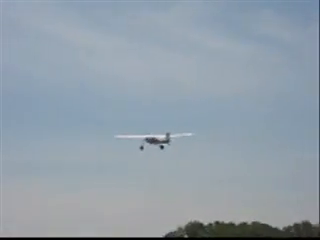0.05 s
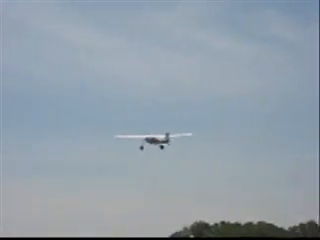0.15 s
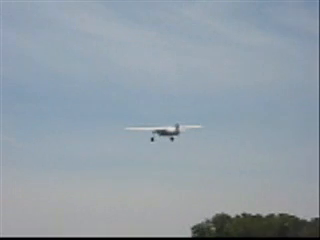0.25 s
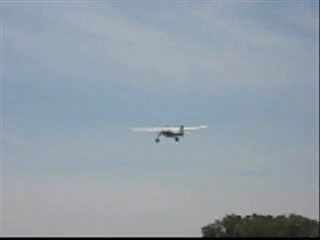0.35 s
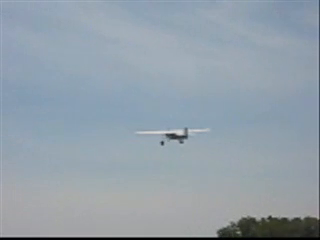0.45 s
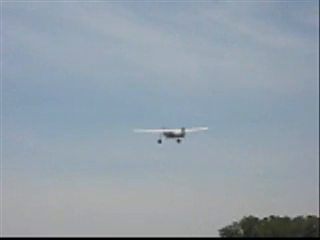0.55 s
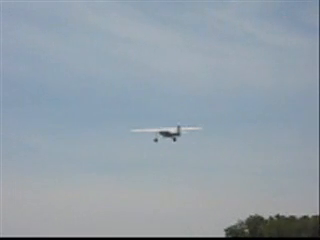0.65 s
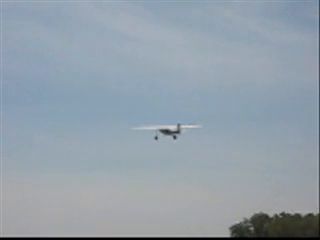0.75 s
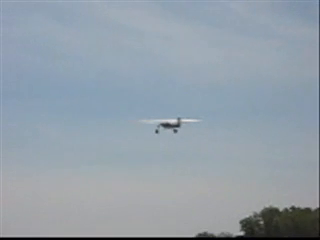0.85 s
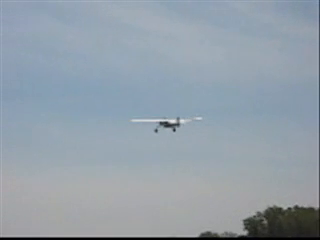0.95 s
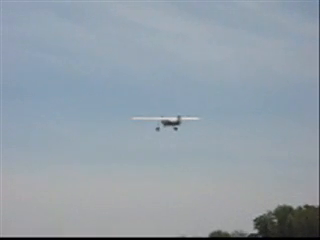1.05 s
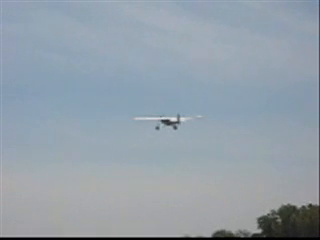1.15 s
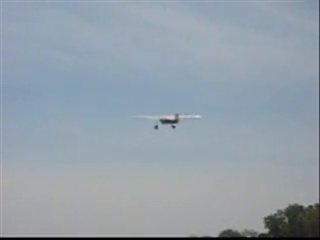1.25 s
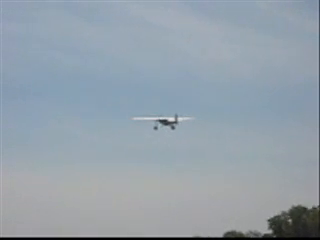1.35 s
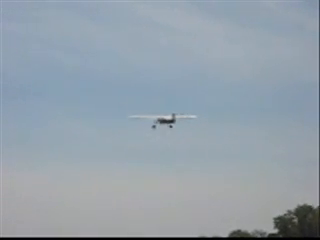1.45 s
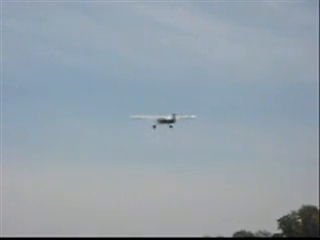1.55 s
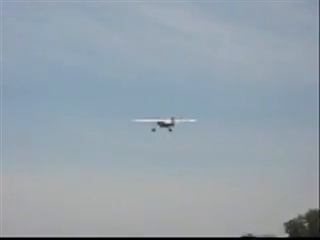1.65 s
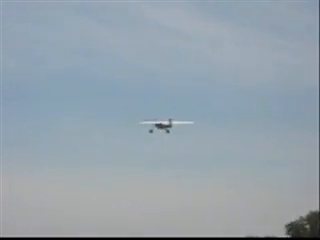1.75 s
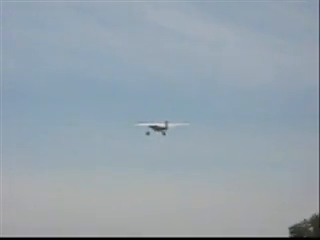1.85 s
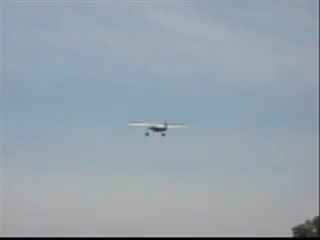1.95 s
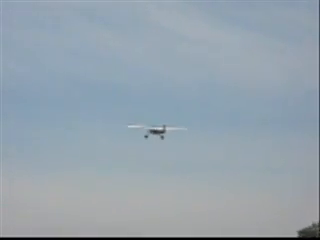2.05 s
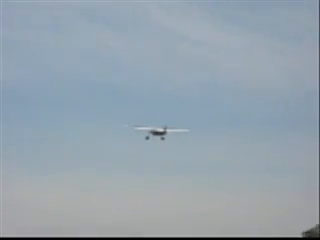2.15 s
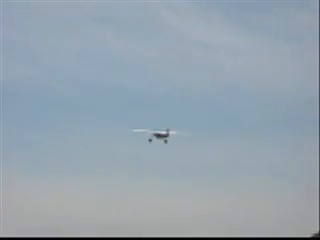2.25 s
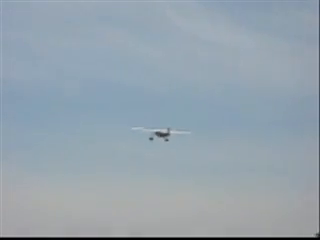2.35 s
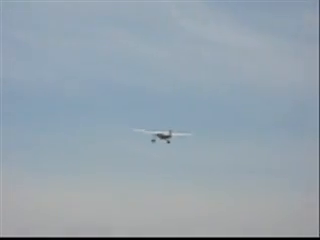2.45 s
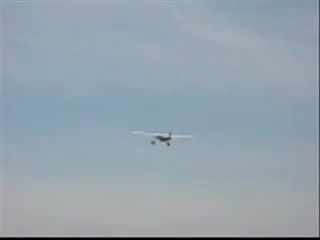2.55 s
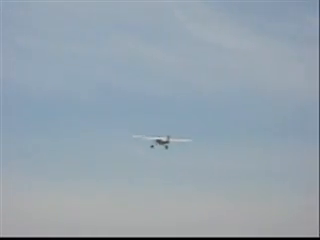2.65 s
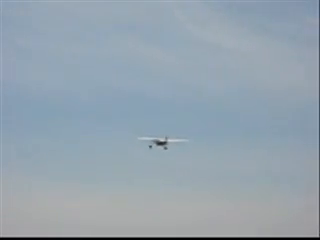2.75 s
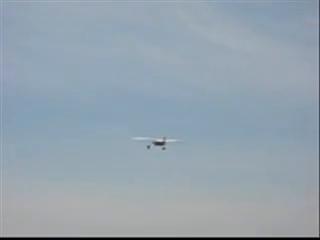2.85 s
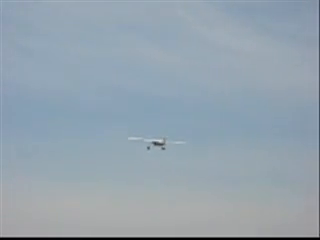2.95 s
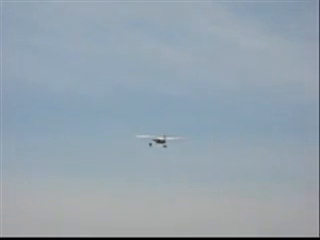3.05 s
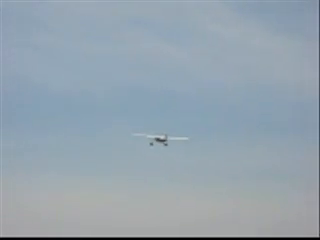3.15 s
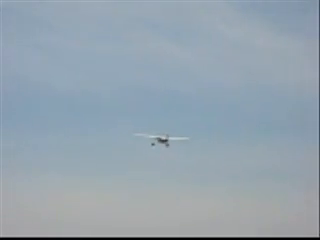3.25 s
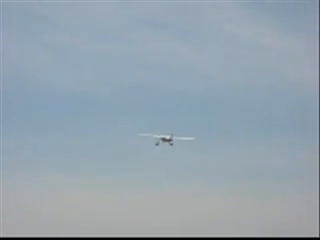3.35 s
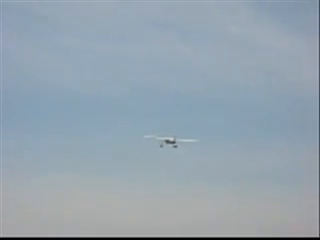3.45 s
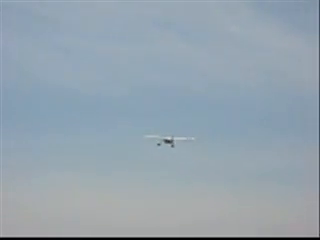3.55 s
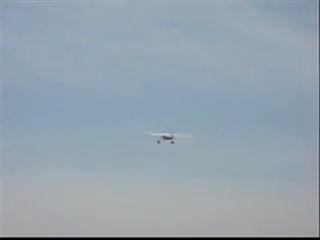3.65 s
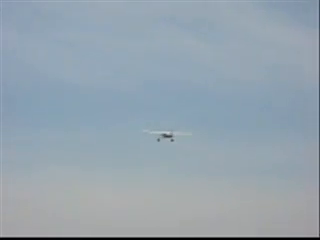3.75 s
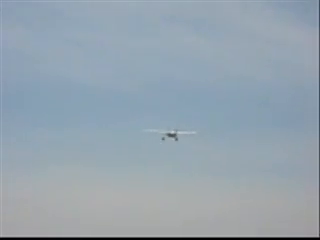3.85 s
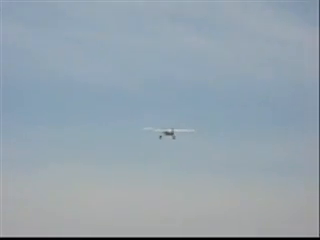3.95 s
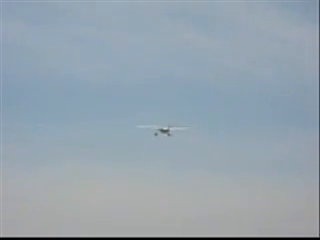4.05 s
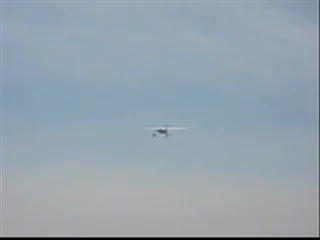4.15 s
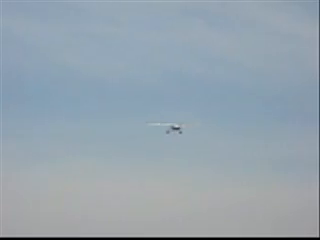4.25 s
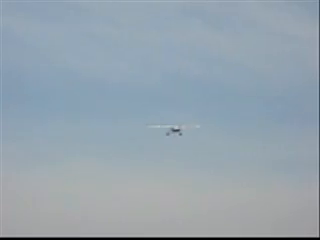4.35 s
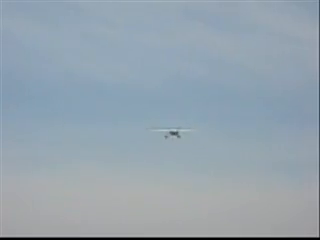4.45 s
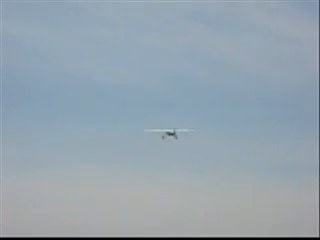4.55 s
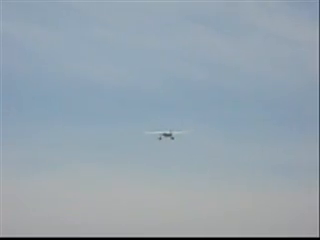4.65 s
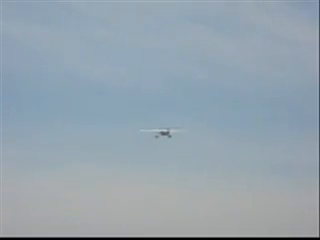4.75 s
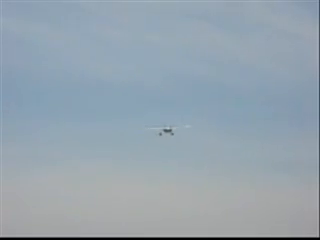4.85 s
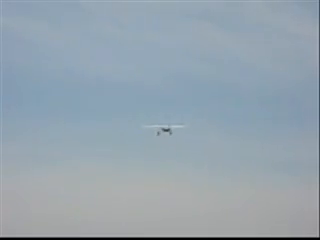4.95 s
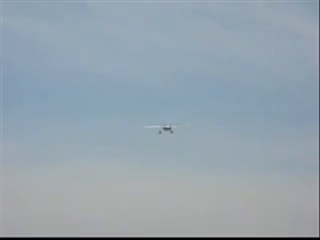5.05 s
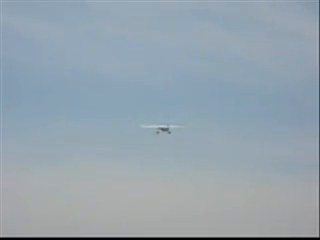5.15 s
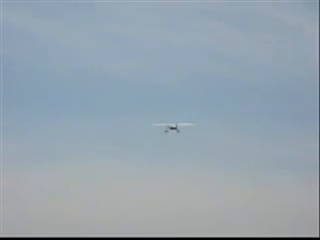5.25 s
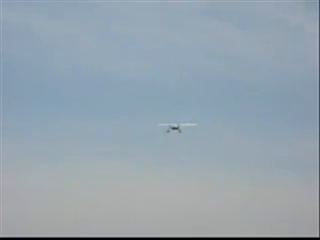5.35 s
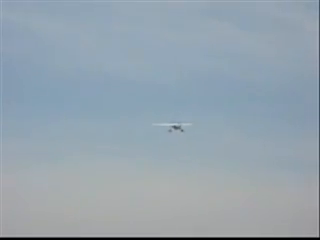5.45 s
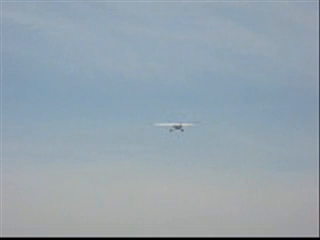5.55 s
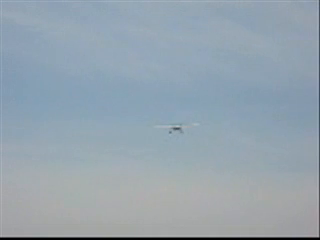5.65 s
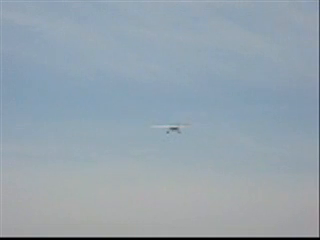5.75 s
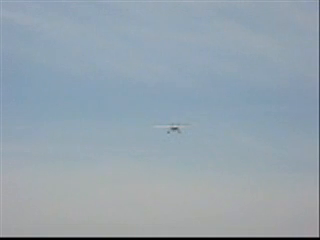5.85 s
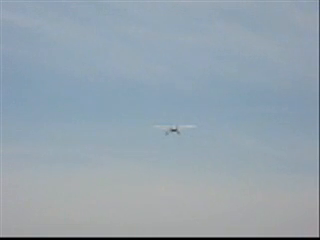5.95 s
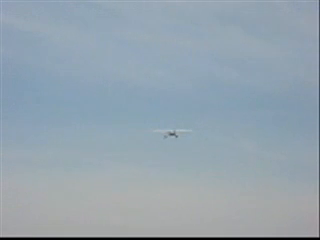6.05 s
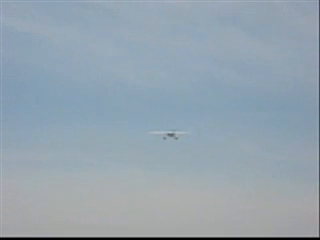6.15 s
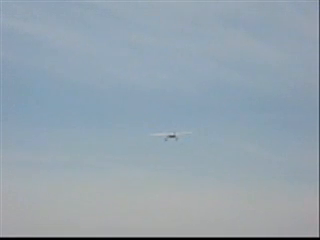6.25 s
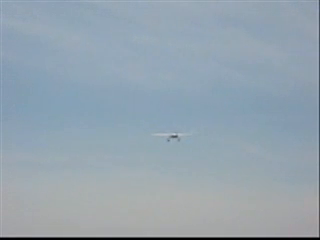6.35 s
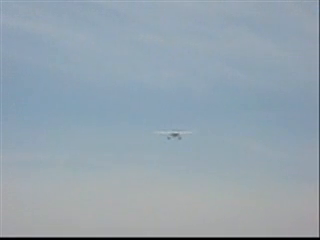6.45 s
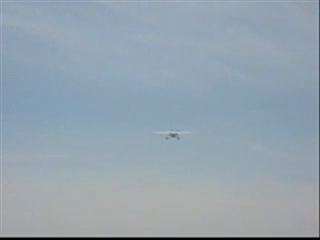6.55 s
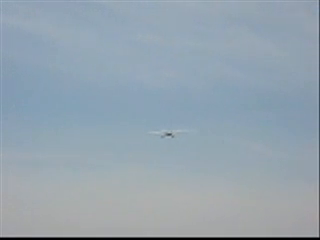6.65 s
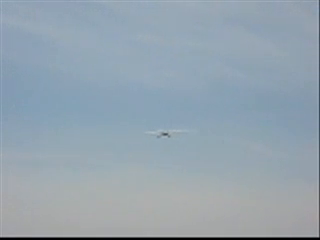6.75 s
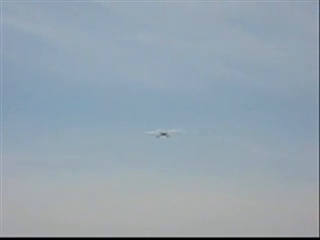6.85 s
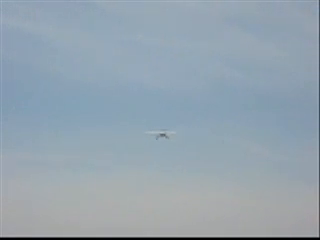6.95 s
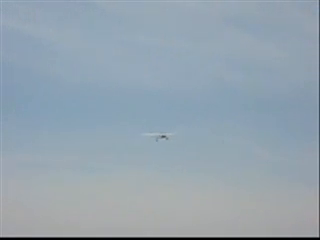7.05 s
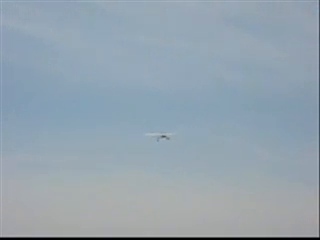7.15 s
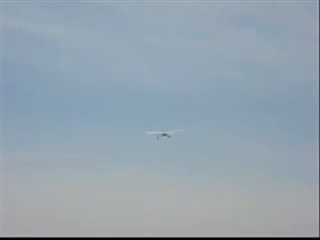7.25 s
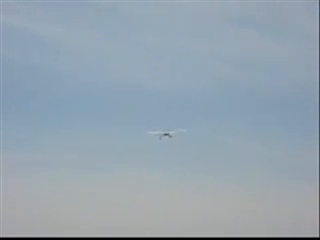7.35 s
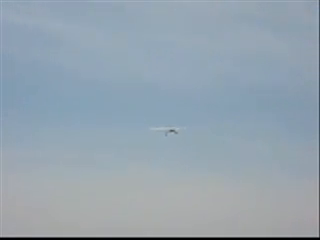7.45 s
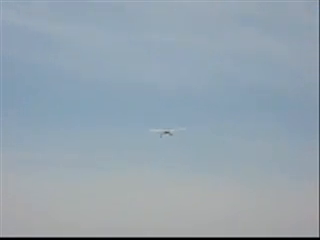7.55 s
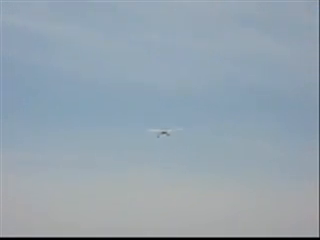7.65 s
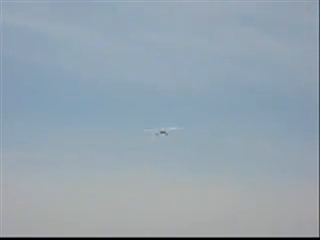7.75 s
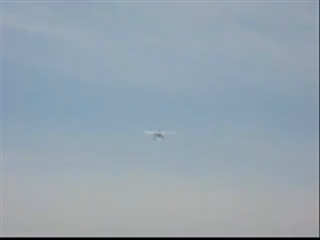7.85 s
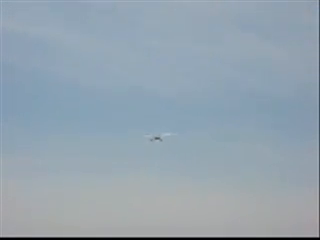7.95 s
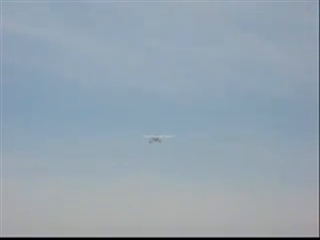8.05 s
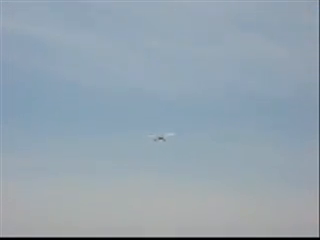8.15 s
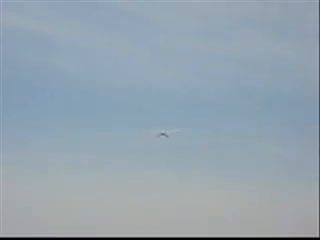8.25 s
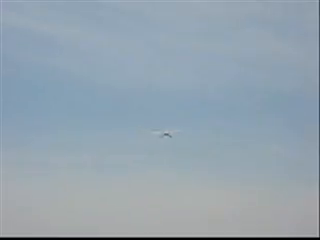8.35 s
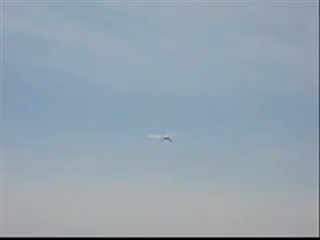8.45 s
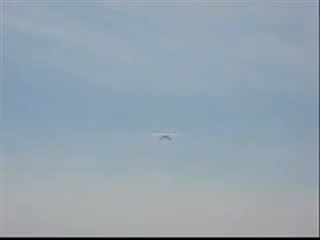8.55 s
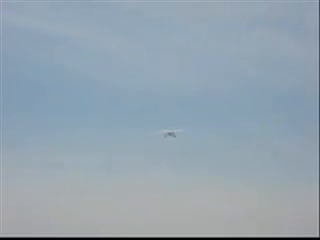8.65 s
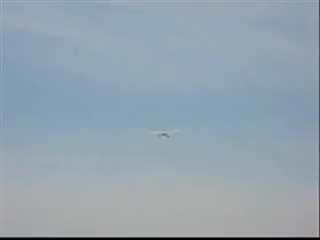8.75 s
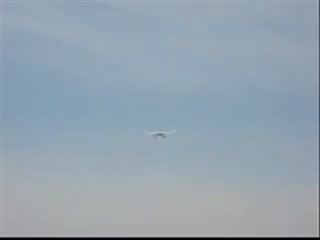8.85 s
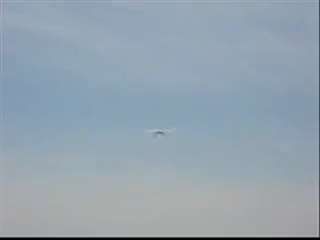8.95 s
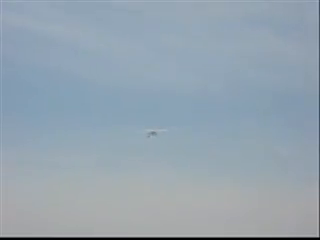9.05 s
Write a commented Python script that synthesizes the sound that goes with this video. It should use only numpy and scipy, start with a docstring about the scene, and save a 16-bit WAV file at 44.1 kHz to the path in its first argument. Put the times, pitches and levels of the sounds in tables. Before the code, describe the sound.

A propeller aircraft with a radial engine is already airborne and flying away, heard outdoors through a small, cheap mono camera microphone with hiss and gritty, mirrored treble. The engine holds an almost constant low drone around 90 to 150 Hz, rough and throbbing with uneven exhaust pulses, under a broad airy roar that swells and sags. Echoes from trees and ground make it waver, and pitch sinks very slightly. Faint treble crackles appear at 0 to 1.6 s, mostly around 1 s. Short creaky finger ticks on the camera come at 3.1, 3.3, 3.5 and 3.7 s, with a faint falling whistle just before the last, then a weak one at 4.2. After a gap, ticks return from 6.3 s and get louder. Sharp snaps at 6.9 and 8.6 s duck the engine briefly; strong clicks fall between them. The thinner, duller drone continues to 9.1 s, without stopping.

```python
"""A nine-cylinder radial aircraft engine climbs away: uneven exhaust pulses sum as harmonics of the engine cycle.
From the start a two-blade propeller beats, an echo off trees makes the tones beat, and a ground echo combs the roar.
Treble grains crackle early; fingers then tick on the small camera, and a faint whistle falls among the ticks.
Late on, two sharp snaps duck the camera's gain control. Throughout, it takes few samples a second and holds
each one, which mirrors the sound into the high treble."""
import sys
import numpy as np
from scipy import signal
from scipy.io import wavfile
from scipy.ndimage import uniform_filter1d

SR = 44100
rng = np.random.default_rng(int(sys.argv[2]) if len(sys.argv) > 2 else 0)


def unload_audio(sound):
    """Save the sound as a 16-bit wav file, at the path given as the first command line argument."""
    columns = np.transpose(np.atleast_2d(sound))
    # keep every value between -1 and 1, then stretch to whole-number steps
    steps = np.round(np.clip(columns, -1, 1) * 32767)
    wavfile.write(sys.argv[1], SR, steps.astype(np.int16))


N = 401310


def amp(db):
    """Decibel law: level in dB to amplitude ratio."""
    return 10 ** (np.asarray(db) / 20)


def evened(x):
    """Normalisation: scales to rms 1."""
    return x / np.sqrt(np.mean(x ** 2))


def curves(rows, t):
    """Linear interpolation: every column of a table, read at the times t."""
    s, *columns = np.transpose(rows)
    return np.array([np.interp(t, s, column) for column in columns])


def wander(t, fastest_hz):
    """Random-phase superposition: slow sines, the faster the weaker, scaled to rms 1."""
    total = 0
    for f in np.geomspace(.5, fastest_hz, 12):
        total = total + np.sin(2 * np.pi * (f * t + rng.random())) / np.sqrt(f)
    return evened(total)


def lowpass(x, hz):
    """Band limitation: a steep linear-phase filter."""
    return signal.oaconvolve(x, signal.firwin(401, hz, window=("kaiser", 10), fs=SR), "same")


# faint falling whistle: t/s, f/Hz, rms level/dB
WHISTLE_GLIDE = [(3.575, 1560, -52), (3.63, 1435, -50), (3.7, 1290, -41)]


def whistle():
    """Frequency glide: phase is the integral of a falling frequency, so one thin tone slides down."""
    t, out = np.arange(WHISTLE_GLIDE[0][0], WHISTLE_GLIDE[-1][0], 1 / SR), np.zeros(N)
    hz, db = curves(WHISTLE_GLIDE, t)
    tone = np.sqrt(2) * amp(db) * np.sin(2 * np.pi * np.cumsum(hz) / SR)
    out[round(t[0] * SR):][:len(t)] = tone * signal.windows.tukey(len(t), .5)
    return out


# brief crackles in the treble: t/s, peak level/dB, f/Hz
CRACKLE_GRAINS = [(0.032, -34.5, 4630), (0.815, -32, 3700), (0.9255, -30, 2600), (0.941, -32, 3500),
                  (0.9735, -32, 2720), (0.972, -33, 3700), (1.009, -30, 3500), (1.2, -32, 3000),
                  (1.55, -37, 4500), (1.1194, -33, 2690)]


def crackles(length_s=0.0096):
    """Tone burst: each grain is a sine under a smooth window, hence soft and narrow in band."""
    t, out = np.arange(0, length_s, 1 / SR), np.zeros(N)
    for s, db, hz in CRACKLE_GRAINS:
        out[round(s * SR):][:len(t)] += amp(db) * np.sin(2 * np.pi * hz * t) * np.hanning(len(t))
    return out


# creaky ticks of the camera body: t/s, creak level/dB, starting f/Hz, length/ms,
# upper mode level/dB relative to the creak, dry click level/dB before decay
BODY_TICKS = [(3.0595, -26, 1260, 6.6, -26, -27), (3.27, -22, 1400, 3.6, -6, -43),
              (3.5139, -16.5, 1360, 4.1, -12, -35), (3.698, -21, 1350, 2.7, -14, -37),
              (4.187, -34, 2400, 3.6, -10, -28), (6.284, -25, 2240, 1.9, -8, -29),
              (6.3809, -31, 2400, 3.6, -8, -28), (6.76, -20.5, 1450, 2.8, -5.5, -34),
              (6.774, -20, 1380, 10, -26, -30), (6.913, -23, 1500, 2.8, -10, -36),
              (6.9339, -11.5, 1290, 7.6, -13, -5.5), (7.0556, -12, 1320, 3.2, -12, -32),
              (7.2966, -11.5, 1170, 3.2, -11, -39), (7.3865, -16, 1460, 5.5, -9.5, -33),
              (7.392, -20, 1420, 2.9, -12, -41), (7.561, -21.5, 1430, 5.3, -10, -41),
              (7.6857, -8.5, 1280, 4.3, -16, -29), (8.092, -9.5, 1320, 3.4, -18, -46),
              (8.2435, -26, 1420, 4.8, -22, -45), (8.492, -22.5, 1290, 4, -12, -38),
              (8.53, -6.5, 1330, 3.5, -17, -33), (8.533, -15, 1100, 5.3, -16, -45),
              (8.568, -8.5, 1330, 12, -10, -6.5), (8.5964, -12, 1510, 5.8, -22, -28)]
# hard snaps, mostly above the band the camera keeps: t/s, level/dB before onset ramp and decay
HARD_SNAPS = [(6.9342, 14), (8.569, 18)]
SNAP_HZ = 12000


def ticks(glide_ms=0.46, upper_ratio=1.65, click_t60=0.02, click_hz=3200, body_hz=500, snap_t60=0.055,
          rattle_db=-38, rattle_t60=0.24):
    """Impact and stick-slip: ticks slide down in pitch over a dull click; snaps ring and leave a rattle."""
    t, out = np.arange(3000) / SR, np.zeros(N + 3000)
    keep, body_keep = np.exp(-2 * np.pi * click_hz / SR), np.exp(-2 * np.pi * body_hz / SR)
    white = rng.standard_normal((len(BODY_TICKS) + len(HARD_SNAPS), len(t) + 1))
    grit = evened(signal.lfilter([1], np.poly([keep, keep, body_keep]), np.diff(white)))
    for (s, db, hz, ms, upper_db, click_db), noise in zip(BODY_TICKS, grit):
        done = np.minimum(t * 1000 / ms, 1)
        turns = hz * t * (1 - glide_ms * done / ms)  # the shortest ticks slide most
        modes = np.sin(2 * np.pi * turns) + amp(upper_db) * np.sin(2 * np.pi * upper_ratio * turns)
        creak = amp(db) * modes * np.sin(np.pi * done ** 0.52)  # fast rise, slower fall
        click = noise * amp(click_db - 60 * t / click_t60) * np.minimum(3 * done, 1)
        out[round(s * SR):][:len(t)] += creak + click
    for (s, db), noise in zip(HARD_SNAPS, grit[::-1]):
        snap = np.sin(2 * np.pi * SNAP_HZ * t) * amp(db - 60 * t / snap_t60)
        rattle = noise * amp(db + rattle_db - 60 * t / rattle_t60) * np.hanning(2 * len(t))[len(t):]
        out[round(s * SR):][:len(t)] += (snap + rattle) * np.tanh(t / .001)  # 1 ms onset
    return out[:N]


# the roar thins with distance: f/Hz, relative level near/dB, relative level far/dB
DISTANCE_BANDS = [(322, -26, -41.5), (437, -31.5, -37.5), (850, -28.5, -36.5), (2400, -40.5, -50),
                  (4820, -46, -65)]
# the roar swells and sags: t/s, whole roar level/dB, level near SWELL_HZ/dB, treble level/dB
ROAR_SWELL = [(0, -1.5, 4, -0.5), (.8, -0.85, 4, -1.4), (1.6, 2, -0.5, -0.3), (2.4, 0.5, -2.5, -2.4),
              (2.8, -1.2, -2, 2.5), (3.3, 0.5, 0.8, 1), (4, 2.1, -4.5, -2.5), (4.4, 1.6, -6.5, -0.7),
              (4.8, -0.3, -1, -3), (5.6, 0.6, -3, 2), (6.1, -2.5, 4, 3.2), (6.8, -2, -3, 0.5),
              (7.3, 1.5, 6.5, 1.2), (7.9, -0.8, -0.5, 1), (8.35, 0.2, 4, -2), (8.8, -1.2, -1.5, 6.5),
              (9.1, 1.5, -3, 2)]
SWELL_HZ, SWELL_OCTAVES, TREBLE_HZ = 450, 0.28, 1500


def roar_levels(t):
    """Attenuation with distance: each band falls from near to far, with swells added in dB."""
    hz, near_db, far_db = np.transpose(DISTANCE_BANDS)[:, :, None]
    whole_db, band_db, treble_db = curves(ROAR_SWELL, t)
    nearness = np.exp(-(np.log2(hz / SWELL_HZ) / SWELL_OCTAVES) ** 2)
    swell_db = whole_db + band_db * nearness + treble_db * (hz > TREBLE_HZ)
    return near_db + (far_db - near_db) * t * SR / N + swell_db


# exhaust pulses of one cycle, uneven through unequal pipes: arrival/share of cycle, relative level/dB
EXHAUST_PULSES = [(0.062, -5.8), (0.178, 0.0), (0.239, -10.2), (0.354, -7.0), (0.497, -5.8), (0.619, -6.7),
                  (0.734, -4.3), (0.797, -4.4), (0.914, -10.4)]


def exhaust_puffs(cycles, uneven_db, puff_s):
    """Impulse response: each firing excites a critically damped puff with a soft rise and fall."""
    fired = np.zeros(N)
    for place, db in EXHAUST_PULSES:
        at = np.flatnonzero(np.diff(np.floor(cycles - place)))
        fired[at] = amp(db + uneven_db * rng.standard_normal(len(at)))
    keep = np.exp(-1 / (puff_s * SR))
    return evened(signal.lfilter([1], [1, -2 * keep, keep ** 2], fired))


# colour of the roar before the ground echo: f/Hz, level added to the bands/dB
ROAR_COLOUR = [(40, -22), (100, 7.5), (250, 2.5), (420, 10.5), (560, 4), (800, 3.5), (1050, -3.5),
               (1200, -7.5), (1720, -1), (2000, -6.5), (2600, -2.5), (3500, 3), (4300, -3.5), (6000, -9.5)]
# ground echo: t/s, delay/ms, amplitude ratio/1 before treble scattering
GROUND_ECHO = [(0, 1.096, 0.5), (5, 1.24, 0.2), (9.1, 1.14, 0)]


def roar(cycles, level_db=-10, patchy_db=1.24, flicker_db=0.91, puff=0.082, puff_s=0.0016, uneven_db=0.5,
         blur_hz=4200):
    """Comb filtering: patchy exhaust and propeller noise meets its ground echo and puffs with each firing."""
    frames, hz = N // 128 + 5, np.fft.rfftfreq(512, 1 / SR)[:80]
    t = np.arange(frames) * 128 / SR
    real, imaginary, patches = rng.standard_normal((frames, len(hz), 3)).T
    # smoothed over frequency, then over time
    patches = evened(uniform_filter1d(uniform_filter1d(patches, size=5, axis=0), size=14, axis=1))
    flicker = evened(uniform_filter1d(rng.standard_normal(frames), size=4))

    log_hz, log_band = np.log(hz + 1), np.log(np.transpose(DISTANCE_BANDS)[0])
    share = np.array([np.interp(log_hz, log_band, one) for one in np.eye(len(log_band))])
    colour_hz, colour_db = np.transpose(ROAR_COLOUR)
    colour = np.interp(log_hz, np.log(colour_hz), colour_db)
    db = level_db + colour[:, None] + share.T @ roar_levels(t) + patchy_db * patches + flicker_db * flicker

    delay_ms, strength = curves(GROUND_ECHO, t)
    strength = strength * np.exp(-(hz[:, None] / blur_hz) ** 2)  # rough grass scatters the treble
    comb = abs(1 + strength * np.exp(-2j * np.pi * hz[:, None] * delay_ms / 1000))
    spectrum = np.zeros((257, frames), complex)
    spectrum[:len(hz)] = (real + 1j * imaginary) * comb * amp(db)
    rush = signal.istft(spectrum, nperseg=512, noverlap=384)[1][:N]
    return rush * evened(1 + puff * exhaust_puffs(cycles, uneven_db, puff_s))


# engine speed as heard: t/s, four-stroke cycle rate f/Hz
ENGINE_SPEED = [(0, 13.243), (1, 13.174), (2, 13.162), (3, 13.132), (4, 13.09), (5, 13.083), (6, 13.044),
                (6.7, 13.061), (7.3, 13.101), (8.2, 13.092), (9.1, 13.102)]


def engine_cycles():
    """Phase accumulation: four-stroke cycles completed, the integral of the cycle rate."""
    return np.cumsum(curves(ENGINE_SPEED, np.arange(N) / SR)[0]) / SR


PIPE_HZ, PIPE_WIDTH_HZ, PIPE_TOP_HZ = 100, 30, 300  # exhaust resonance, its width, treble roll-off


def lag(multiple):
    """Fourier series: phase of one multiple of the nine-pulse cycle, rung through the exhaust pipe."""
    place, db = np.transpose(EXHAUST_PULSES)
    hz = multiple * ENGINE_SPEED[0][1]
    resonance = -1 / (1 - (hz / PIPE_HZ) ** 2 + 1j * hz * PIPE_WIDTH_HZ / PIPE_HZ ** 2)
    pipe = resonance / (1 + 1j * hz / PIPE_TOP_HZ)
    return np.angle(pipe * np.sum(amp(db) * np.exp(-2j * np.pi * multiple * place)))


# standing-out tones: multiple of the cycle rate/1, relative level near/dB, relative level far/dB
STRONG_TONES = [(7, -23.5, -23), (9, -28, -25), (11, -29, -23.5), (12, -43, -30), (13, -27, -31.5),
                (16, -28.5, -29.5), (18, -33.5, -35.5)]
# shared by all strong tones: t/s, level/dB
STRONG_LEVEL = [(0, -1), (.5, -2.5), (2, -0.1), (4, 0.1), (5, 1.3), (6.5, -0.1), (7.3, -1), (8.3, -2.5),
                (8.7, -7), (9.1, -4.5)]
# weaker tones: multiple of the cycle rate/1, level/dB relative to low_db, or to high_db plus a roar band
WEAK_TONES = [(3, -44), (5, -27.5), (8, -18), (10, -17), (14, -15.5), (15, -55), (17, -17.5), (19, -17),
              (20, -19), (21, -14), (22, -12.5), (23, -12), (24, -12), (25, -14), (26, -22.5), (27, -18),
              (28, -18.5), (29, -17), (30, -20.5), (31, -18.5), (32, -13), (33, -13), (34, -16.5),
              (35, -22.5), (36, -16)]
# beat of the two-blade propeller: t/s, level/dB before the tree echo
PROPELLER_BEAT = [(0, -25), (.4, -30), (1.3, -29), (1.9, -37), (2.9, -28), (3.2, -27), (3.9, -30),
                  (4.4, -29.5), (4.9, -38), (6, -35), (7, -40), (7.4, -31), (7.8, -41), (9.1, -43)]
BLADE_PASSES, BLADE_LEAD_RAD = 4, 1.0  # passes a cycle; lead over the exhaust tone of the same pitch
# echo off the tree line, whose path shortens as the aircraft leaves: t/s, delay/ms
TREE_ECHO_DELAY = [(0, 102.3), (.7, 97.7), (1.5, 92.7), (2.3, 88.5), (3.2, 82.9), (4.2, 78.2), (5.5, 73),
                   (7, 68.5), (9.1, 63.8)]
# strength of that echo: t/s, amplitude ratio/1
TREE_ECHO_SHARE = [(0, 0.48), (.7, 0.42), (1.5, 0.73), (2.3, 0.47), (3.2, 0.38), (4.2, 0.04), (5.5, 0.14),
                   (7, 0.08), (9.1, 0.24)]


def tones(cycles, low_db=-23, high_db=4, fade_db=2.0, strong_fade_db=.6, jitter_rad=.08, waver_rad=.035,
          rough=.11):
    """Harmonic synthesis and interference: turbulence sways the multiples; their tree echo makes them beat."""
    t, coarse = np.arange(N) / SR, np.arange(0, N / SR + .1, .02)
    roar_db, out = roar_levels(coarse), np.zeros(N)
    shared_db = curves(STRONG_LEVEL, coarse)[0]
    levels = []
    for k, near, far in STRONG_TONES:
        db = near + (far - near) * coarse * SR / N + shared_db
        levels.append((k, db + strong_fade_db * wander(coarse, 2.7)))
    levels.append((BLADE_PASSES, curves(PROPELLER_BEAT, coarse)[0]))
    for k, db in WEAK_TONES:
        # high tones fade with the roar around them
        growl_db = roar_db[0] if k * ENGINE_SPEED[0][1] < 385 else roar_db[1]
        base_db = low_db if k < STRONG_TONES[-1][0] else high_db + growl_db
        levels.append((k, db + base_db + fade_db * wander(coarse, 6.5)))

    echo_cycles = curves(ENGINE_SPEED, coarse)[0] * curves(TREE_ECHO_DELAY, coarse)[0] / 1000
    echo_share = curves(TREE_ECHO_SHARE, coarse)[0]
    shared = jitter_rad * wander(coarse, 8.3)  # eddies shift all tones together and keep the pulses sharp
    for k, db in levels:
        own = waver_rad * (k / 10) ** 2 * (1 + coarse / 2.5) * wander(coarse, 14.0)  # more with distance
        both = 1 + echo_share * np.exp(-2j * np.pi * k * echo_cycles)  # direct sound and echo
        sway = k / 10 * shared + own + np.unwrap(np.angle(both)) + BLADE_LEAD_RAD * (k == BLADE_PASSES)
        phase = 2 * np.pi * k * cycles + lag(k) + np.interp(t, coarse, sway)
        out += np.interp(t, coarse, amp(db) * abs(both)) * np.cos(phase)
    firing = np.floor(cycles * len(EXHAUST_PULSES)).astype(int)
    strength = 1 + rough * rng.standard_normal(firing[-1] + 1)[firing]  # firings differ in strength
    return np.sqrt(2) * out * uniform_filter1d(strength, size=300)


def scene():
    """Superposition: small treble sounds, handling ticks and engine add linearly."""
    cycles = engine_cycles()
    return (whistle() + crackles() + ticks() + roar(cycles) + tones(cycles))[None]


BAND_HZ, HOLD, EDGE_HZ = 6200, 4, 12800  # band limit, output samples per held sample, final limit


def record(dry, limit_db=-2, attack_s=0.00057, recover_s=0.38, hiss_db=-54, offset=0.0039):
    """Compression and aliasing: full-band peaks duck the gain; band limit, hiss and held samples follow."""
    x, growth = dry[0], np.exp(np.arange(N) / SR / recover_s)
    over_db = np.maximum(20 * np.log10(abs(x) + 1e-9) - limit_db, 0)
    over_db = np.maximum.accumulate(over_db * growth) / growth  # the cut dies away slowly
    keep = np.exp(-1 / (attack_s * SR))
    over_db = signal.lfilter([1 - keep], [1, -keep], over_db)
    samples = (lowpass(x, BAND_HZ) * amp(-over_db))[::HOLD]
    samples = samples + amp(hiss_db) * rng.standard_normal(len(samples)) + offset  # converter hiss
    return lowpass(np.repeat(samples, HOLD)[:N], EDGE_HZ)[None]


dry = scene()
out = record(dry)
unload_audio(out)
```